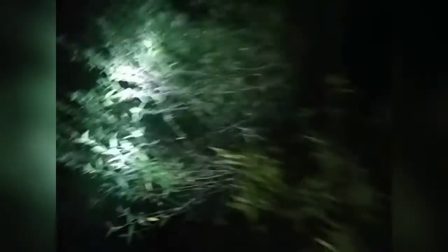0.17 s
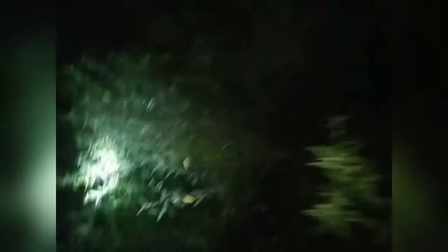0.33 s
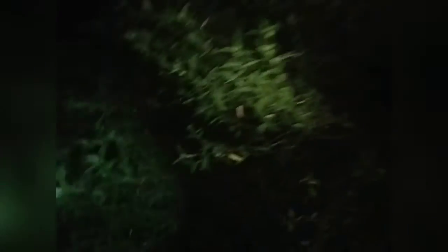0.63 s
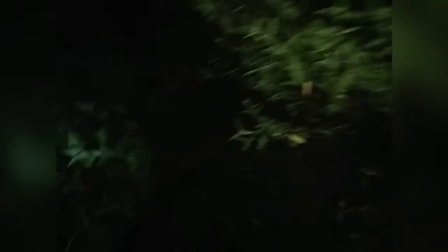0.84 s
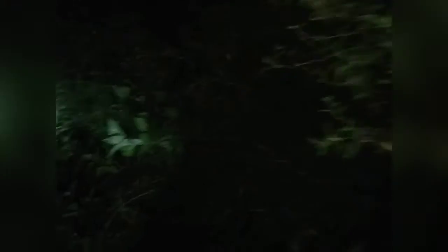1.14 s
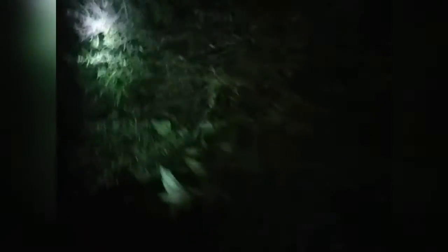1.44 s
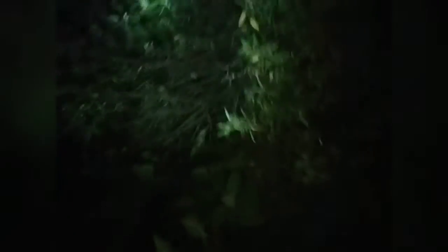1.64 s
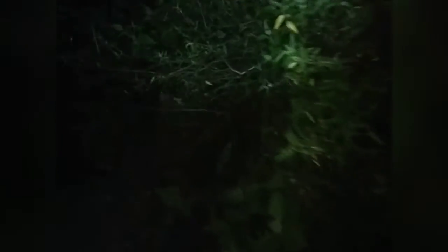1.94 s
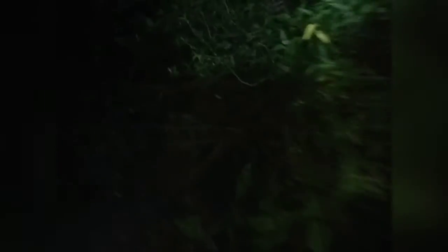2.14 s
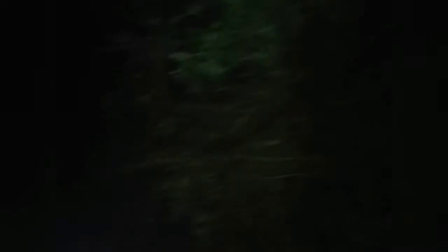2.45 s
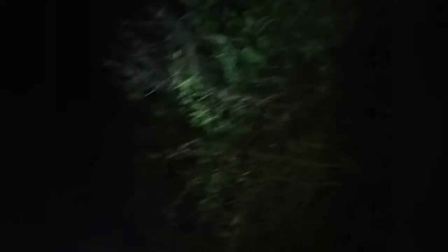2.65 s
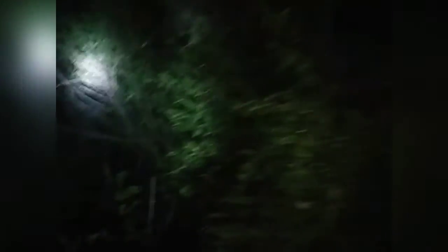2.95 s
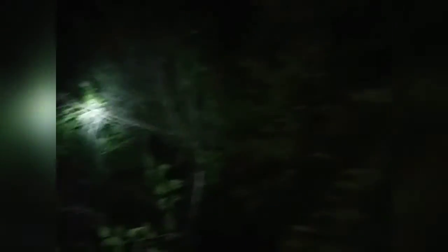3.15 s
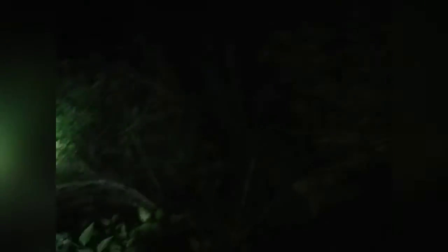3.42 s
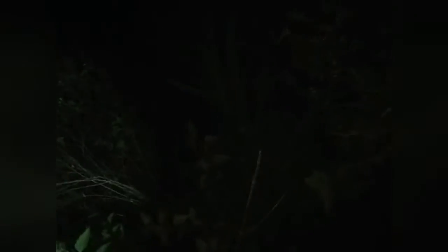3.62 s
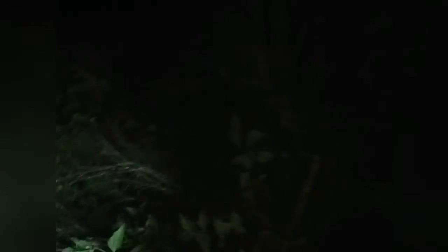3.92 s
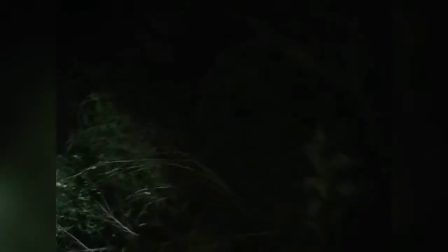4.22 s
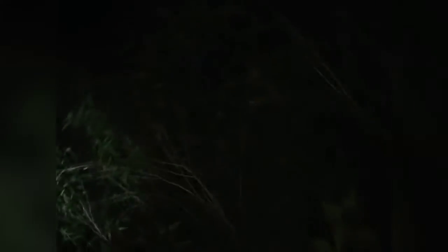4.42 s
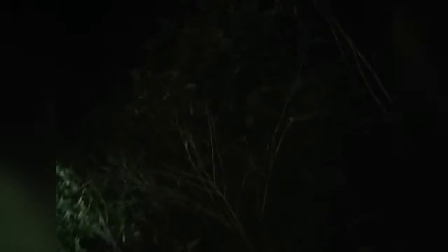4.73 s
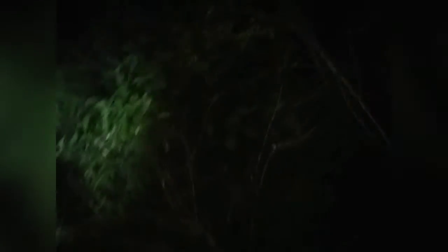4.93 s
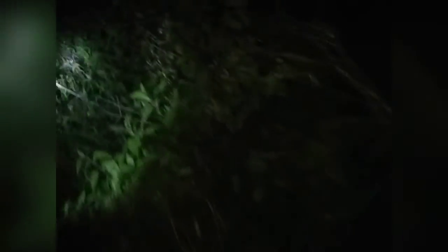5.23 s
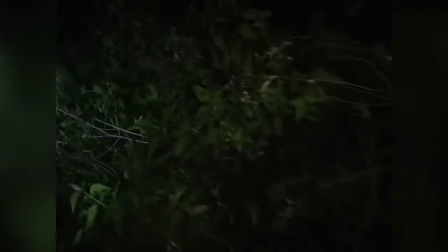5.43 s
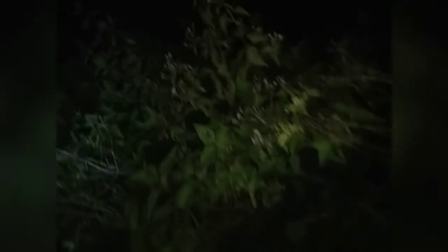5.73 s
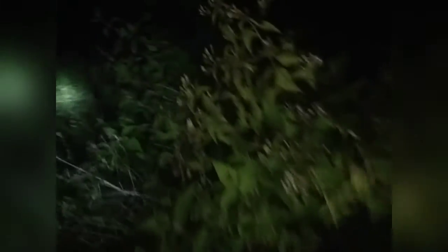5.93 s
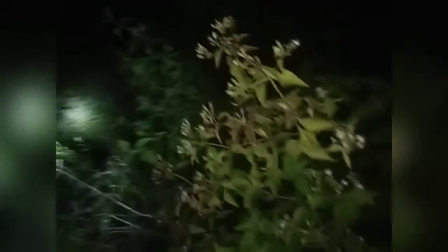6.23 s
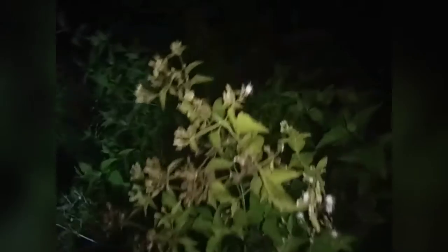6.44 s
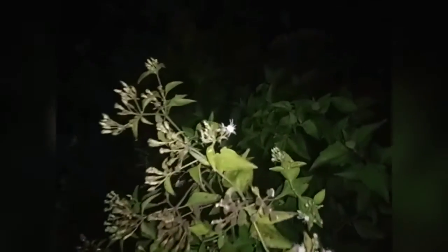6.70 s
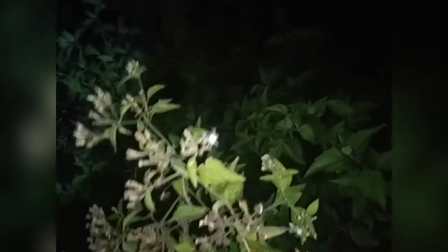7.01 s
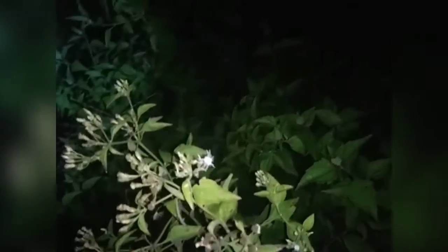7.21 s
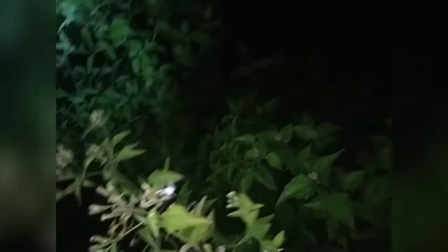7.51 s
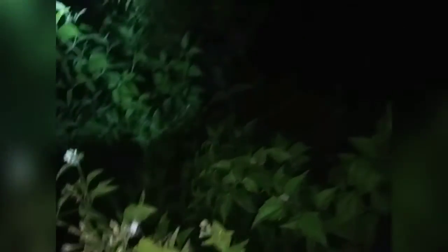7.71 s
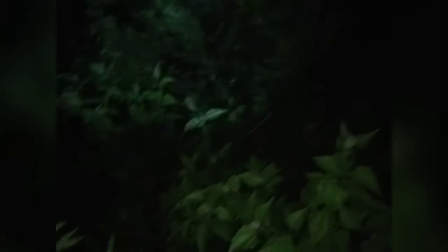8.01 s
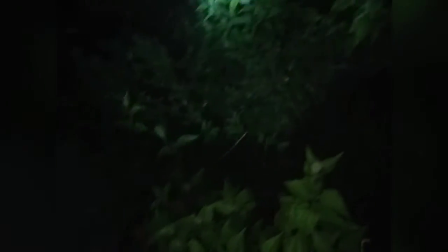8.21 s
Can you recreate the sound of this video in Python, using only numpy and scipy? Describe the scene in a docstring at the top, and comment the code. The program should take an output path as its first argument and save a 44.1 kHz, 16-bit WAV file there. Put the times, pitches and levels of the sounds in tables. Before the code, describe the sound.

A handheld microphone moves through thick night foliage. Coarse leaf crackle and dry brushing come and go close by, with brittle twig snaps, strongest just after two seconds. Behind them are steady high cricket trills, a lower blurred trill, rapid thin chirps with small pauses, and a small engine puttering faintly some way off under soft outdoor haze. The last two seconds are calmer.

```python
"""A chorus of crickets trills in the night undergrowth; one close insect chirps eight times a second.
Someone pushes through the bushes: leaves rustle and twigs snap near the microphone, as noise bursts.
The insects are short gliding whistles, one for each wing stroke, blurred by echoes among the leaves.
A small engine, a train of coloured puffs, idles some way off over a soft wash of filtered noise."""
import sys
import numpy as np
from scipy import signal
from scipy.fft import rfft, irfft, next_fast_len
from scipy.io import wavfile
from scipy.ndimage import uniform_filter1d, map_coordinates

SR = 44100
rng = np.random.default_rng(int(sys.argv[2]) if len(sys.argv) > 2 else 0)


def dump_mix(stems):
    """Bounce the given channels to the path in sys.argv[1] as a 16-bit WAV at rate SR."""
    frames = np.atleast_2d(stems).T  # one column per channel
    limited = np.clip(frames, -1, 1)  # hard clip at full scale
    pcm = np.round(limited * 32767).astype(np.int16)
    wavfile.write(sys.argv[1], SR, pcm)


N = 368676
TIME = np.arange(N) / SR

# strength of the higher strokes that trail each close chirp: t/s, level/dB
CHIRP_TRAIL = [(0, 13), (1, -4), (2, -4), (4.5, -15), (6.5, -8), (7.0, -24), (8.36, -20)]


def amp(db):
    """Decibels to gain."""
    return 10 ** (np.asarray(db) / 20)


def unit(x):
    """Scales to rms 1."""
    return x / np.sqrt(np.mean(x ** 2) + 1e-20)


def curves(rows):
    """Each column of a table as a line through time."""
    s, *columns = np.transpose(rows)
    return [np.interp(TIME, s, c) for c in columns]


def add(mix, s, sound):
    """Mixes a sound in at time s, or at the very start if s is negative."""
    part = mix[max(round(s * SR), 0):][:len(sound)]
    part += sound[:len(part)]


def drift(per_s):
    """Smooth random wavering of rms 1, through per_s random points a second."""
    knots = rng.standard_normal(4000)
    return unit(map_coordinates(knots, [TIME * per_s], order=2, mode="wrap"))


def colour(x, points):
    """Filters by a curve of (f/Hz, level/dB); output has rms 1."""
    hz, db = np.transpose(points)
    size = next_fast_len(N + 8192)
    grid = np.fft.rfftfreq(size, 1 / SR)
    gain = amp(np.interp(np.log(grid + 1), np.log(hz), db))
    return unit(irfft(rfft(x, size) * gain, size)[:N])


def band(x, hz, spread, order=2):
    """Band-pass from hz / spread to hz * spread."""
    edges = [hz / spread, hz * spread]
    return signal.sosfilt(signal.butter(order, edges, "band", fs=SR, output="sos"), x)


def foliage(x, wet_db, t60):
    """Adds the scattered echoes of leaves, stems and ground, dying 60 dB in t60 seconds."""
    t = TIME[:SR // 2]
    sparse = rng.random(len(t)) < 1 / 20
    taps = rng.standard_normal(len(t)) * sparse * np.exp(-np.log(1000) * t / t60)
    echoes = signal.oaconvolve(x, taps / np.linalg.norm(taps))[:N]
    return x + amp(wet_db) * echoes


def stroke(hz, length, glide):
    """One wing stroke: a short gliding whistle that swells and fades over length seconds."""
    along = np.linspace(0, 1, int(length * SR))
    turns = np.cumsum(hz * (1 + glide * (along - .5))) / SR
    return np.sqrt(2) * np.sin(np.pi * along) ** 2 * np.sin(2 * np.pi * turns)


def trill(per_s, hz, duty, sweep, uneven_db):
    """Each wing stroke rings the wing afresh for a moment, its pitch sagging as the stroke slows."""
    scatter_hz = 38  # no two wing strokes ring at quite the same pitch
    strokes = np.cumsum(per_s * (1 + 0.04 * drift(12))) / SR + rng.random()
    along = np.minimum(strokes % 1 / duty, 1)
    which = strokes.astype(int)
    strength, detune = np.clip(rng.standard_normal((2000, 2)), -2, 2)[which].T
    pitch = hz * (1 + sweep * (.5 - along) + 0.004 * drift(60)) + scatter_hz * detune
    turns = np.cumsum(pitch) / SR + rng.random(2000)[which]
    swell = np.sin(np.pi * along) ** 2
    return unit(amp(uneven_db * strength) * swell * np.sin(2 * np.pi * turns))


def wash(roar_db=1.5, haze_db=3, quiet_db=-66):
    """Distant roar and broad haze, each wavering a little, over a faint even hiss: all filtered noise."""
    # outdoor wash before the two trims: t/s, far roar level/dB, broad haze level/dB
    wash_level = [(0, -46.5, -47), (0.8, -46.5, -51), (1.65, -46.5, -47), (2.1, -47, -52.5),
                  (3.3, -46.5, -49.5), (4.15, -45.5, -54.5), (4.4, -51.5, -49.5), (6.3, -53, -54),
                  (7.2, -54, -59.5), (8.36, -53, -62)]
    # colour of the far roar: f/Hz, level/dB
    roar_colour = [(20, -23), (150, 5.5), (330, -20), (520, -35), (700, -11), (930, 0), (1100, -3),
                   (1350, -22), (2000, -27), (3200, -37), (6000, -59)]
    # colour of the broad haze: f/Hz, level/dB
    haze_colour = [(100, 2.5), (300, -7), (480, -5.5), (750, -3.5), (1250, 0), (1800, -2), (2400, -6.5),
                   (2900, -13.5), (3600, -23), (6000, -44), (12000, -27)]
    # colour of the hiss under them: f/Hz, level/dB
    quiet_colour = [(100, 28.5), (3000, -29.5), (5000, 22), (8000, 19.5), (10500, -14), (12000, -12)]
    roar, haze = curves(wash_level)
    roar_noise, haze_noise, quiet_noise = rng.standard_normal((3, N))
    far = amp(roar + roar_db + 0.32 * drift(25)) * colour(roar_noise, roar_colour)
    broad = amp(haze + haze_db + 0.52 * drift(40)) * colour(haze_noise, haze_colour)
    return far + broad + amp(quiet_db) * colour(quiet_noise, quiet_colour)


def engine(first_firing=0.0056):
    """One exhaust puff a firing, each a little different, booms in the muffler; the body rattles and drones."""
    # engine speed: t/s, firing rate f/Hz
    idle = [(0, 24.3), (2.75, 23.17), (5.5, 23.11), (8.36, 23.16)]
    # loudness along the path, before trims: t/s, exhaust level/dB, body rattle level/dB
    engine_level = [(0, -37.5, -49.5), (2.3, -37.5, -51.5), (2.7, -37.5, -56), (3.5, -37.5, -56),
                    (4.3, -40, -57.5), (5.2, -39, -54.5), (6.05, -39.5, -54), (6.45, -44, -59),
                    (7.3, -40.5, -58.5), (7.7, -44.5, -63.5), (8.36, -44.5, -65.5)]
    # colour of the exhaust in the muffler: f/Hz, level/dB
    muffler = [(23, -43), (46, -50), (70, -12), (93, -13), (117, -3), (140, 1.5), (163, -5), (190, -20),
               (240, -52.5), (330, -35), (600, -84.5)]
    # colour of the body's rattle: f/Hz, level/dB
    rattle_colour = [(120, -43), (200, 4.5), (250, -1.5), (305, 2.5), (350, -10), (420, -32), (520, -21),
                     (900, -62)]
    # drone partials: multiple of the beat rate, relative level/dB
    partials = [(5, 11), (6, 1), (7, -0.5), (8, -4.5), (9, -7), (10, -4.5), (11, -6), (12, -8.5)]
    # the drone carries best at one spot on the path
    drone_db, drone_swell_db, drone_at_s, drone_width_s = -66.5, 12, 5.08, 1.16

    exhaust_db, rattle_db = curves(engine_level)
    turns = np.cumsum(curves(idle)[0]) / SR - first_firing * idle[0][1]  # counts firings
    at = np.flatnonzero(np.diff(np.floor(turns)) > 0)
    late, force = rng.standard_normal((len(at), 2)).T
    puffs = np.zeros(N)
    puffs[np.clip(at + (.0004 * late * SR).astype(int), 0, N - 1)] = 1 + .17 * force
    gas, shake = rng.standard_normal((2, N))
    boom = colour(unit(puffs) + .42 * gas, muffler)
    rattle = colour(.5 * unit(puffs) + shake, rattle_colour)

    beats = 3 * turns / 2  # three beats to every two firings
    drone = np.zeros(N)
    for multiple, db in partials:
        phase = 2 * np.pi * (multiple * beats + rng.random()) + 0.75 * drift(10)
        drone += amp(db + 3.35 * drift(6)) * np.sin(phase)
    swell_db = drone_swell_db * np.exp(-((TIME - drone_at_s) / drone_width_s) ** 2)
    return amp(exhaust_db + 0.96) * boom + amp(rattle_db + 2.0) * rattle + amp(drone_db + swell_db) * drone


def low_trill(flutter_db=2.5):
    """Tree crickets farther off, blurred by the bushes, swelling and sinking many times a second."""
    # lower, farther trill: t/s, level/dB
    low_level = [(0, -53.5), (1, -56), (3, -57), (5, -53), (6.5, -56.5), (8.36, -55.5)]
    near = trill(58.5, 2520, duty=.6, sweep=.06, uneven_db=3)
    far = trill(41, 2670, duty=.7, sweep=.08, uneven_db=3)
    both = near * amp(flutter_db * drift(18)) + 0.72 * far * amp(flutter_db * drift(18))
    return amp(curves(low_level)[0]) * unit(foliage(both, wet_db=-2.5, t60=0.3))


def chorus(loud_hz=6830, length=0.0051):
    """Several crickets at nearly one pitch beat against each other; leaves shade the nearer ones on and off."""
    # nearer crickets, shaded by leaves, before a 2.5 dB cut: t/s, level/dB
    near_level = [(0, -48.5), (0.48, -39.5), (1.02, -51.5), (1.2, -41.5), (2.75, -41.5), (3.0, -37),
                  (3.4, -47.5), (4.15, -44.5), (4.85, -50.5), (5.5, -61), (6.05, -47), (6.42, -55.5),
                  (7.15, -48.5), (8.36, -47)]
    # nearer singers: wing strokes/Hz, pitch f/Hz, level/dB relative to each other
    near_singers = [(52.06, 6790, -7), (47.5, 6800, -8), (35.05, 6730, -14.5)]
    # farther, mostly lower singers, always there: wing strokes/Hz, pitch f/Hz, level/dB before echoes
    far_singers = [(58.26, 6660, -56), (42, 6500, -60.5), (54.2, 6340, -67.5)]
    # single wing strokes that leap out: t/s at mid-stroke, level/dB
    loud_strokes = [(.67, -34), (0.689, -33.5), (.72, -39), (.778, -37), (1.881, -33), (2.079, -36),
                    (2.68, -32), (2.9, -37), (2.96, -32.5), (3.017, -36), (3.088, -30.5), (6.541, -39),
                    (7.832, -43)]
    near, far = np.zeros((2, N))
    for per_s, hz, db in near_singers:
        near += amp(db) * trill(per_s, hz, duty=.72, sweep=.012, uneven_db=3.2)
    for per_s, hz, db in far_singers:
        far += amp(db) * trill(per_s, hz, duty=.7, sweep=.03, uneven_db=4.5)
    near = foliage(near, wet_db=-5, t60=.1) * amp(1.2 * drift(14))
    out = amp(curves(near_level)[0] - 2.5) * unit(near) + foliage(far, wet_db=-2.0, t60=0.16)
    for s, db in loud_strokes:
        add(out, s - length / 2, amp(db) * stroke(loud_hz, length, glide=-0.0073))
    return out


def neighbours(level_db=-57, spread_db=5.0, count=64):
    """Other insects of the chirper's kind whistle at random times, following half its trail's level in dB."""
    out, trail = np.zeros(N), curves(CHIRP_TRAIL)[0]
    for when, pitch, size in rng.random((count, 3)):
        hz = 7200 + 1400 * pitch
        db = level_db + trail[int(when * N)] / 2 + spread_db * (2 * size - 1)
        add(out, when * N / SR, amp(db) * stroke(hz, length=0.033, glide=0.013))
    return foliage(out, wet_db=-6, t60=.18)


def chirper(length=0.019, trail_db=-6, glide=0.011, echo_db=-10, rasp_db=-62):
    """A faint scrape as the wings part, a short whistle, then higher strokes and echoes that beat with it."""
    # even runs of chirps with a hitch between them: first chirp t/s, end t/s
    runs = [(0.014, 2.0), (2.364, 3.15), (3.243, 4.03), (4.106, 5.3), (5.808, 8.3)]
    # loudness as the microphone moves among the leaves, before scaling: t/s, level/dB
    chirp_level = [(0, -50), (0.38, -55.5), (0.62, -61), (1.3, -62), (1.8, -58.5), (3.1, -58.5),
                   (3.45, -50), (3.95, -59), (4.4, -63), (4.95, -64), (5.4, -86), (6.1, -50), (6.42, -69),
                   (6.64, -54.5), (6.78, -60), (7.55, -60), (7.85, -54.5), (8.36, -68)]
    every_s, chirp_hz, scatter_hz, uneven_db = .1213, 7690, 50, 1.2
    # colour of the scrape: f/Hz, level/dB
    scrape_colour = [(1900, -35), (2350, -5), (2600, 0), (3050, -24), (3700, -22), (4600, -33), (9000, -45)]

    whistle, scrape = np.zeros((2, N))
    level, trail = curves(chirp_level)[0], curves(CHIRP_TRAIL)[0]
    times = np.concatenate([np.arange(first, end, every_s) for first, end in runs])
    for s in times[times < TIME[-1]]:
        force, detune, grip = rng.standard_normal(3)
        after = amp(trail[int(s * SR)])
        size = 2.75 * amp(level[int(s * SR)] + uneven_db * force)
        size /= np.sqrt(1 + 2 * after ** 2)  # a strong trail takes its share of the chirp's level
        hz = chirp_hz + scatter_hz * detune
        add(whistle, s - .004, size * stroke(hz, length, glide))
        add(whistle, s + .013, amp(echo_db) * size * stroke(hz, length, glide))  # the ground's echo
        for late, higher in rng.random((9, 2)):
            trailing = stroke(hz * (.96 + .18 * higher), length, glide)
            add(whistle, s + 0.03 * late - .008, amp(trail_db) * size * after * trailing)
        add(scrape, s - .016, amp(3 * grip) * np.hanning(int(.036 * SR)))
    rasp = colour(scrape * rng.standard_normal(N), scrape_colour)
    return foliage(whistle, wet_db=-7, t60=.2) + amp(rasp_db) * rasp


def pushing():
    """Strength of the crushing and of the brushing: the powers of overlapping pushes add."""
    # pushes that swell, hold and settle, before trims:
    # t/s at full strength, rise/s, hold/s, settle/s, crushing level/dB, dry brushing level/dB
    pushes = [(0.0, 0.056, 0.018, .45, -53, -62), (0.22, 0.11, .02, 0.2, -55.5, -67),
              (0.489, 0.076, 0.025, .17, -48, -58.5), (0.8, .2, .15, .15, -72.5, -89),
              (1.124, .04, 0.16, .3, -64.5, -63.5), (1.469, 0.16, 0.025, 0.38, -44.5, -54.5),
              (1.617, .15, 0.044, 0.2, -60, -60), (1.905, 0.39, 0.023, .3, -52, -64),
              (2.163, 0.2, 0.035, 0.12, -44, -56), (2.363, 0.12, .02, 0.36, -40.5, -49),
              (2.433, .12, .02, 0.12, -62, -49), (2.85, .2, 0.11, 0.33, -73, -78),
              (3.172, 0.062, 0.045, 0.33, -46, -58), (3.345, .2, 0.032, 0.51, -51.5, -55),
              (3.71, .33, 0.025, 0.29, -46.5, -60), (4.12, .2, 0.036, 0.55, -50, -57.5),
              (4.382, .15, 0.016, .22, -50, -61), (4.684, .22, .03, 0.38, -63, -63),
              (4.86, 0.061, .03, 0.27, -56.5, -59.5), (5.018, 0.079, 0.39, 0.43, -55, -59),
              (5.62, .15, 0.044, .12, -61.5, -71), (5.99, 0.08, .04, .25, -53, -61),
              (6.1, 0.12, 0.016, 0.28, -44.5, -50.5), (6.256, 0.26, .03, .1, -51, -74),
              (6.797, 0.25, 0.021, .2, -66.5, -75), (7.02, 0.39, .03, 0.21, -66, -67.5),
              (7.712, .08, .02, .1, -66, -68.5)]
    swell_db = 21  # how far a push climbs during its rise and falls while it settles
    stir_crush_db, stir_brush_db = -86, -78  # constant faint stir
    crush, brush = amp(stir_crush_db) ** 2, amp(stir_brush_db) ** 2
    for s, rise, hold, settle, crush_db, brush_db in pushes:
        away = np.maximum((s - TIME) / rise, 0) + np.maximum((TIME - s - hold) / settle, 0)
        power = amp(-swell_db * np.minimum(away, 10)) ** 2
        crush = crush + amp(crush_db) ** 2 * power
        brush = brush + amp(brush_db) ** 2 * power
    return np.sqrt(crush), np.sqrt(brush)


def crackle(per_s, spread_db, slide):
    """Clumps of tiny leaf contacts of unequal size, with the hiss of leaf sliding on leaf."""
    size = amp(spread_db * np.minimum(rng.exponential(1, N), 3)) * rng.choice([-1, 1], N)
    ticks = unit(size * (rng.random(N) < per_s / SR))
    clumps = amp(1.5 * drift(130) + 1.1 * drift(30))
    return (ticks + slide * rng.standard_normal(N)) * clumps


def leaves(crush_db=3.0, brush_db=3.5):
    """Leaves near the microphone are crushed and brush past each other: coarse and fine crackle."""
    # colour of crushed leaves: f/Hz, level/dB
    crush_colour = [(150, -5.5), (350, -3.5), (550, -5.5), (1000, -9.5), (1800, 2), (3000, -1.5),
                    (4300, 1.5), (5200, -5), (6000, -3.5), (8000, -14.5), (11000, -48)]
    # colour of dry brushing: f/Hz, level/dB
    brush_colour = [(2000, -4), (5000, -2), (6000, -20), (7300, -8), (8500, -3), (10000, 7), (11000, 0.5),
                    (12000, -9.5)]
    crush, brush = pushing()
    coarse = crackle(per_s=1500, spread_db=5, slide=.65)
    fine = crackle(per_s=3000, spread_db=4, slide=.8)
    crushed = foliage(colour(coarse, crush_colour), wet_db=-8.5, t60=0.076)
    brushed = colour(fine + 0.28 * coarse, brush_colour)
    return amp(crush_db) * crush * crushed + amp(brush_db) * brush * brushed


def twigs(spread=1.26):
    """A snap is a sudden burst of breaking fibres: band-passed noise that dies away, mostly in milliseconds."""
    # twigs and stems snapping, with one longer scratch of a flicked leaf at 2.225 s: t/s, level/dB before a 4
    # dB lift, centre f/Hz, t60/s
    snaps = [(1.467, -38, 7660, 0.016), (1.549, -34.5, 3000, 0.0088), (2.1696, -22.5, 1180, 0.0048),
             (2.170, -36, 477, 0.018), (2.170, -21.5, 5600, 0.0053), (2.2034, -21, 4080, 0.0051),
             (2.203, -28, 7760, 0.039), (2.225, -43.5, 7200, 0.2), (2.378, -34, 555, 0.025),
             (2.653, -43, 3070, 0.01), (3.204, -33.5, 2860, 0.012), (3.293, -31.5, 940, 0.017),
             (3.4469, -31.5, 2200, 0.0046), (3.468, -32.5, 4000, 0.0041), (3.505, -36, 1730, 0.01),
             (4.106, -37, 8500, 0.024), (4.4244, -38, 2450, .015), (4.8574, -36, 7900, 0.053),
             (4.866, -38, 1900, 0.039), (5.3765, -36, 1750, 0.026), (5.4687, -32.5, 3300, 0.0084),
             (5.6335, -40.5, 3780, 0.0091), (6.0205, -36, 8100, 0.013), (6.091, -36.5, 5050, .02),
             (6.433, -57, 4000, 0.045), (7.861, -47, 7900, 0.03), (7.862, -52.5, 5200, 0.15)]
    out, t = np.zeros(N), TIME[:SR // 5]
    for s, db, hz, t60 in snaps:
        fibres = rng.standard_normal(len(t))
        fade = np.exp(-np.log(1000) * t / t60)
        burst = (unit(band(fibres, hz, spread)) + .1 * fibres) * fade
        burst *= np.linalg.norm(fade) / np.linalg.norm(burst)  # same energy as the bare fade
        add(out, s, amp(db + 4) * burst)
    return foliage(out, wet_db=-11, t60=.1)


def scene():
    """All sources at one microphone."""
    background = wash() + engine() + low_trill() + chorus()
    return (background + neighbours() + chirper() + leaves() + twigs())[None]


def record(dry, depth_db=12, knee_db=3.0, top_hz=11750):
    """The recorder's noise suppressor turns down faint patches of the spectrum; then its band limit."""
    # level per bin around which the suppressor sets in: f/Hz, level/dB
    threshold = [(200, -65), (500, -70.5), (900, -71.5), (2000, -80.5), (2600, -67.5), (3200, -84),
                 (5000, -80.5), (5900, -67), (7500, -93.5), (10000, -89.5)]
    hz, _, z = signal.stft(dry[0], SR, nperseg=1024, noverlap=768)
    power = uniform_filter1d(uniform_filter1d(abs(z) ** 2, size=5, axis=0), size=5, axis=1)
    at_hz, limit_db = np.transpose(threshold)
    over_db = 10 * np.log10(abs(power) + 1e-16) - np.interp(hz, at_hz, limit_db)[:, None]
    z = z * amp(-depth_db * (1 - np.tanh(over_db / knee_db)) / 2)
    gated = signal.istft(z, SR, nperseg=1024, noverlap=768)[1][:N]
    low_pass = signal.firwin(161, top_hz, window=("kaiser", 9), fs=SR)
    return signal.oaconvolve(gated, low_pass, "same")[None]


dry = scene()
out = record(dry)
dump_mix(out)
```